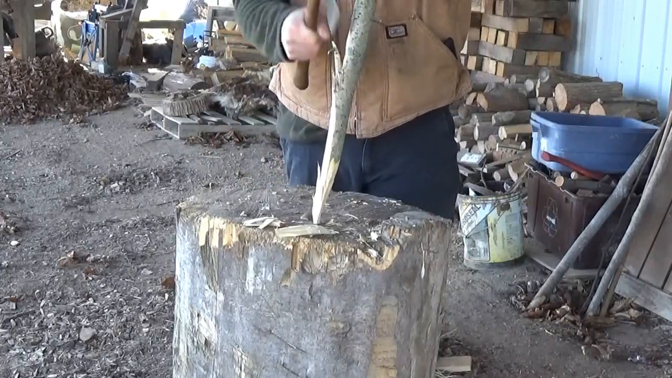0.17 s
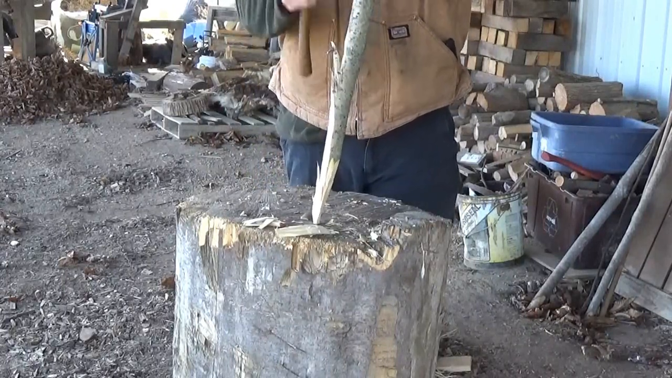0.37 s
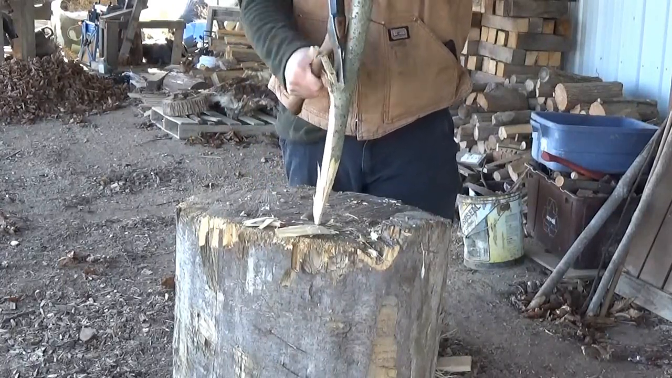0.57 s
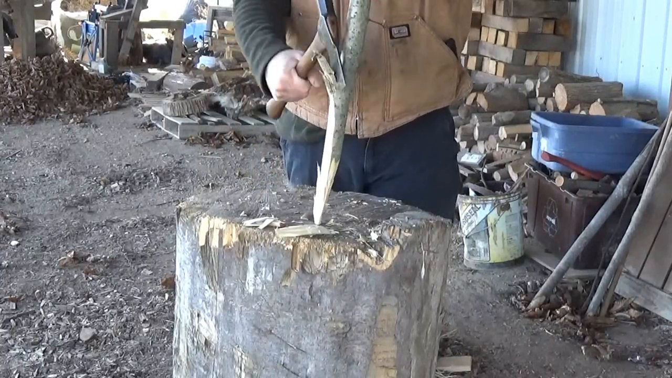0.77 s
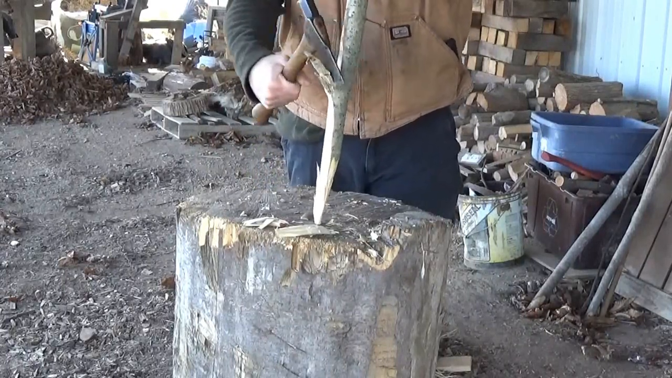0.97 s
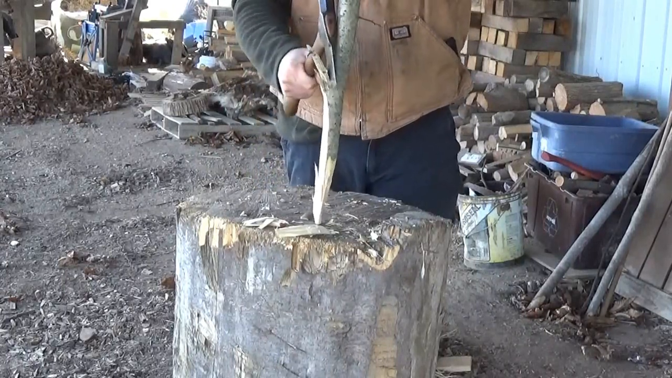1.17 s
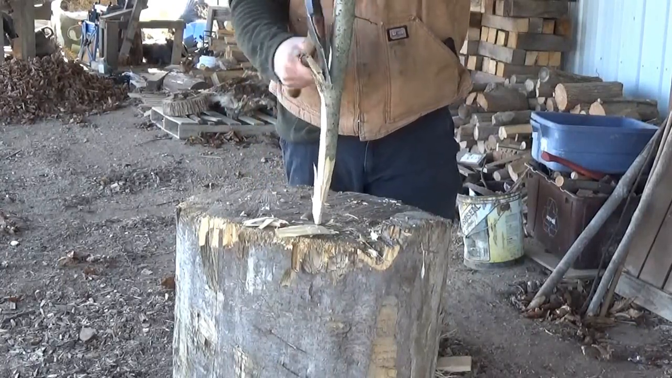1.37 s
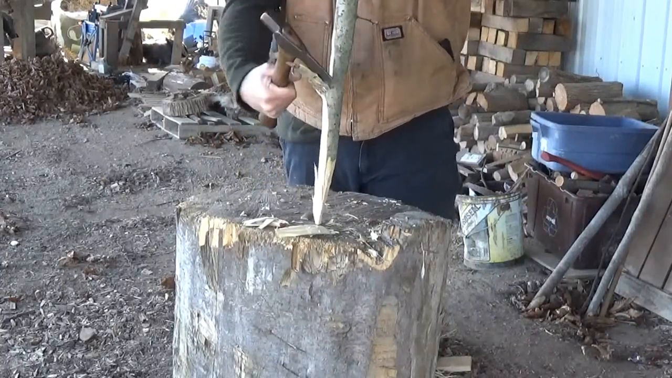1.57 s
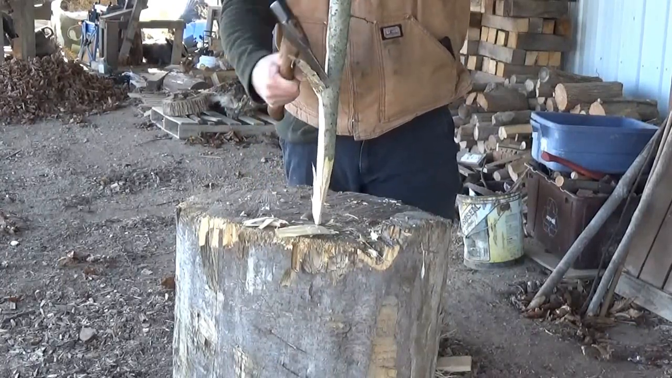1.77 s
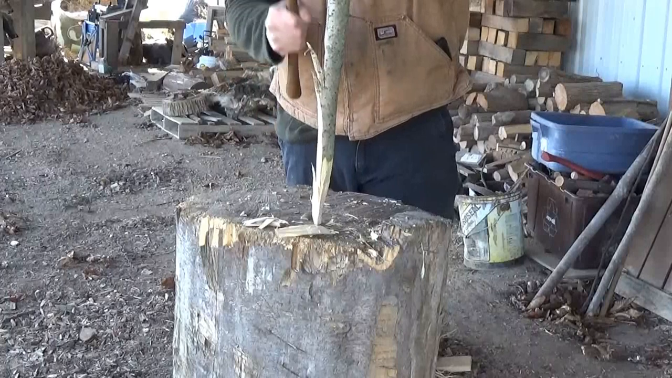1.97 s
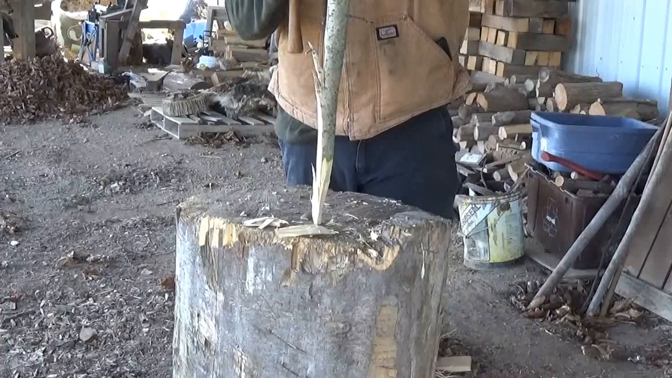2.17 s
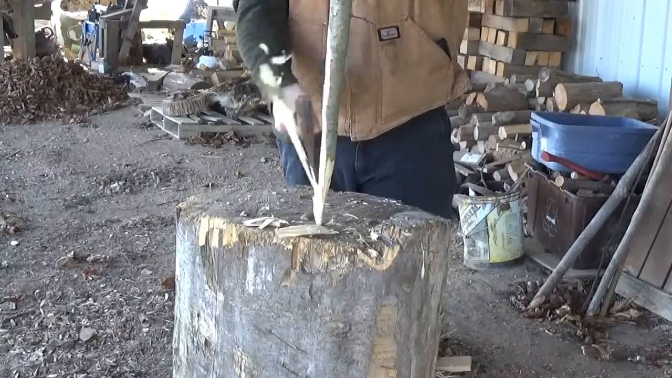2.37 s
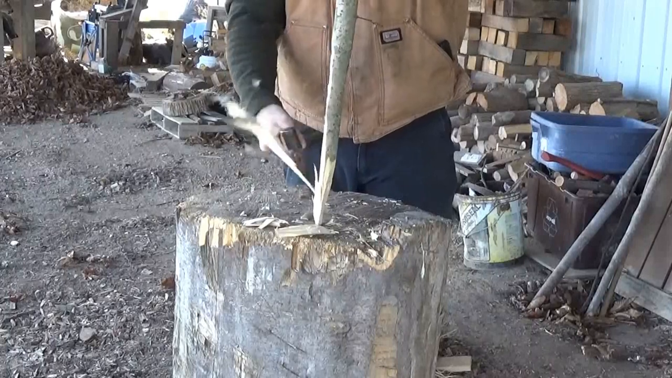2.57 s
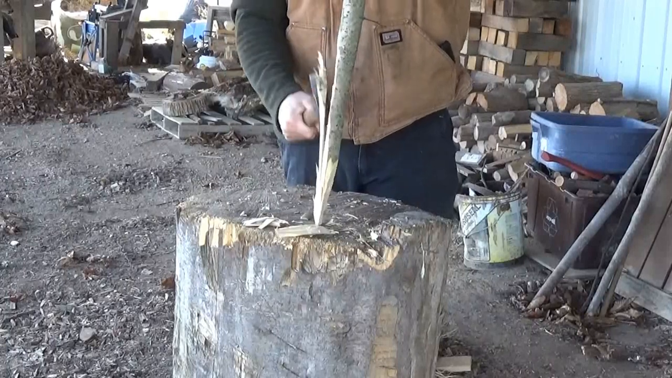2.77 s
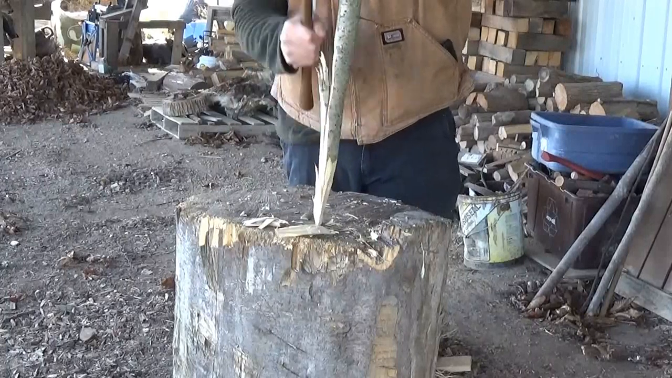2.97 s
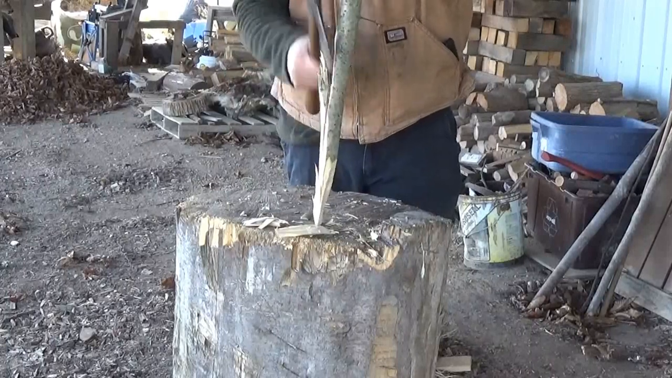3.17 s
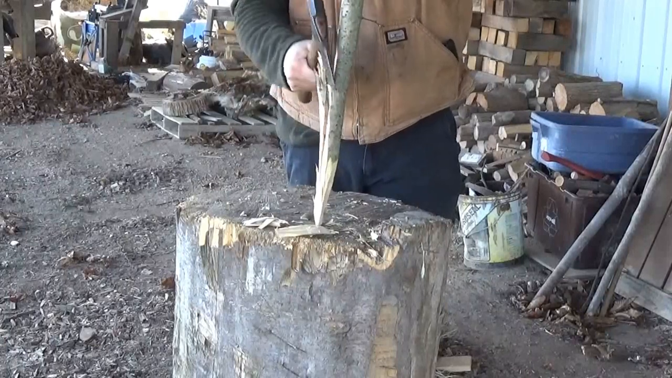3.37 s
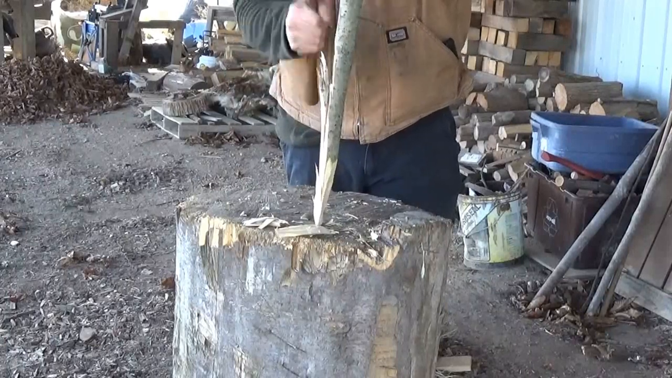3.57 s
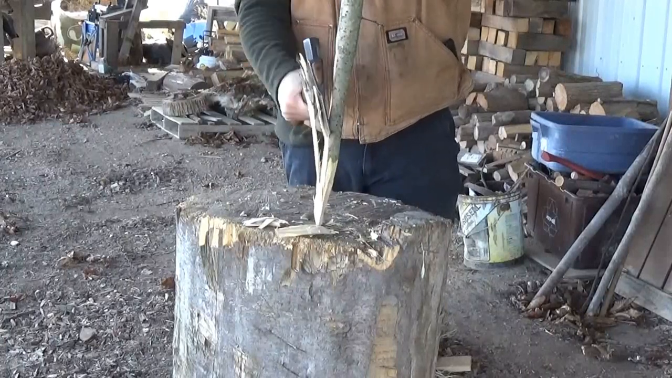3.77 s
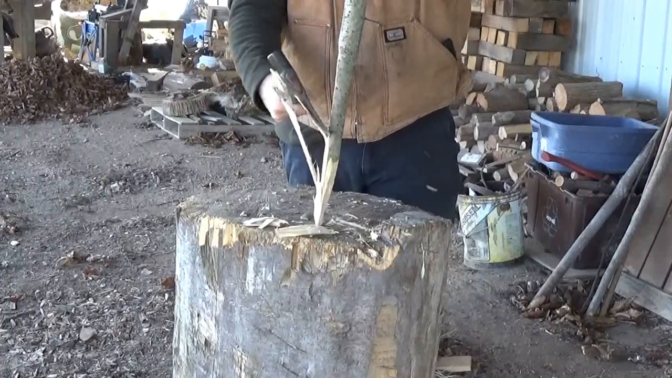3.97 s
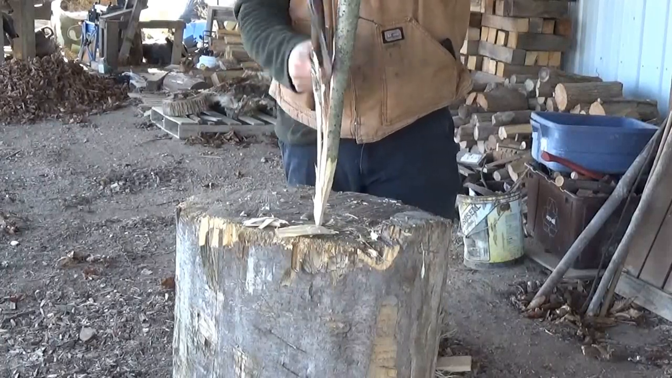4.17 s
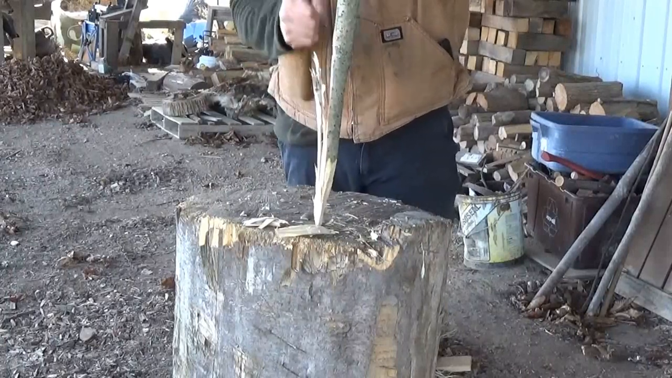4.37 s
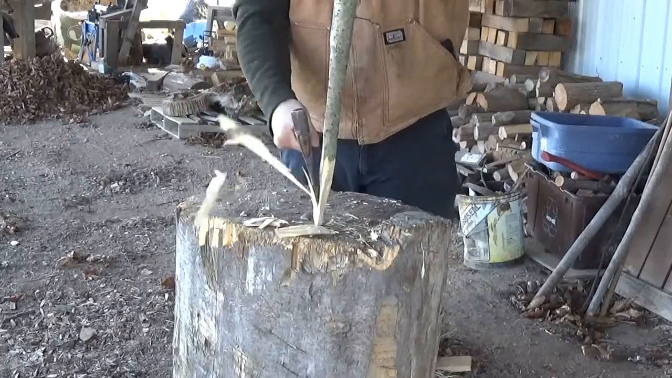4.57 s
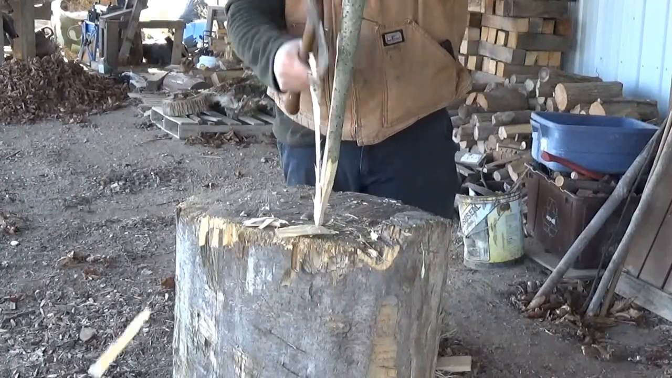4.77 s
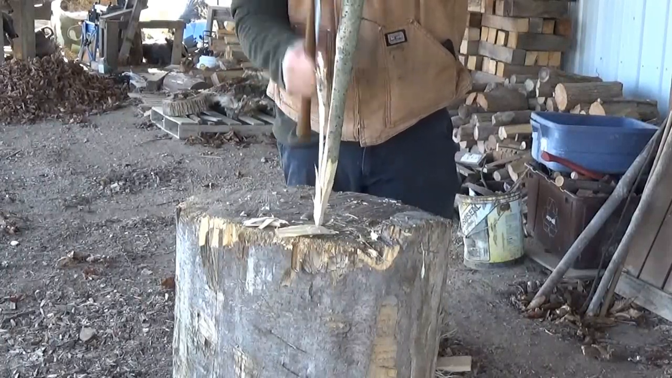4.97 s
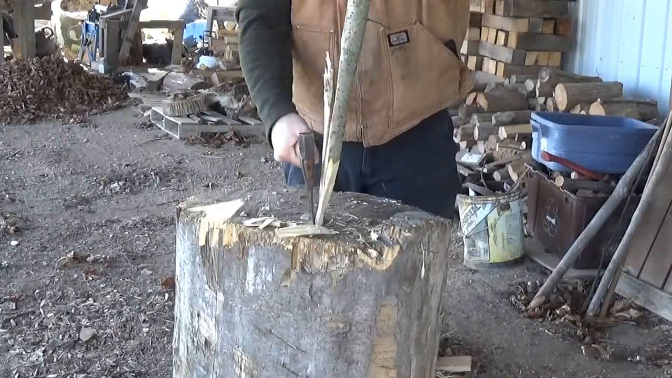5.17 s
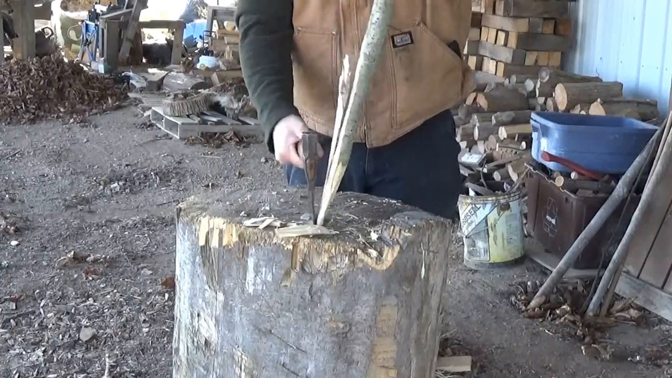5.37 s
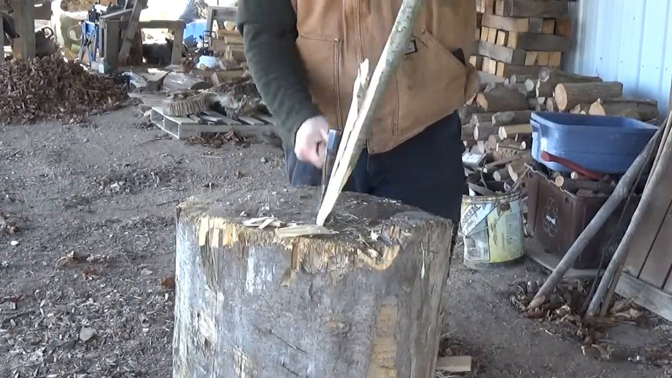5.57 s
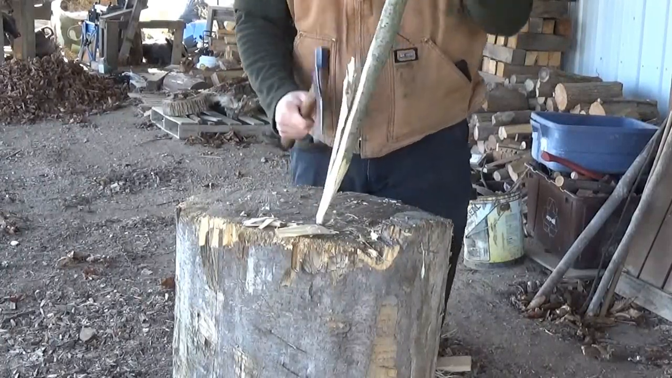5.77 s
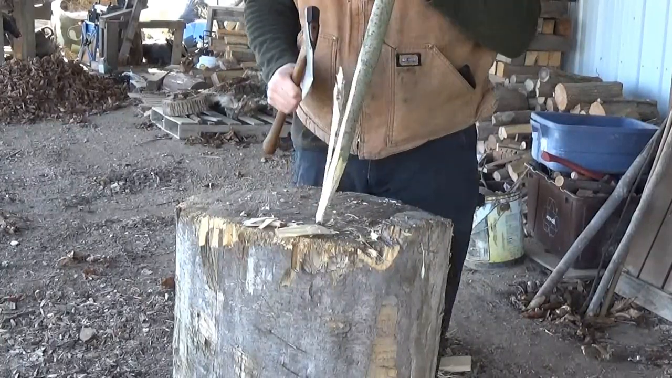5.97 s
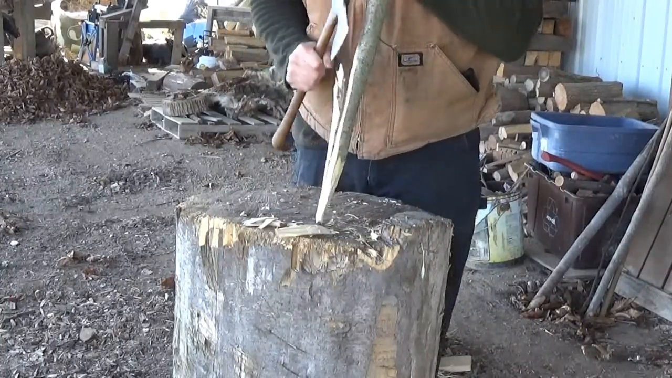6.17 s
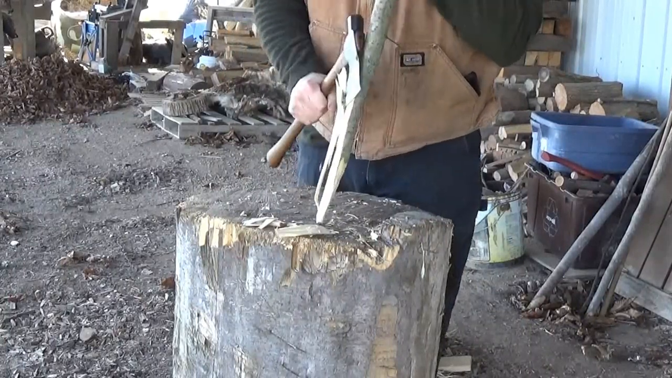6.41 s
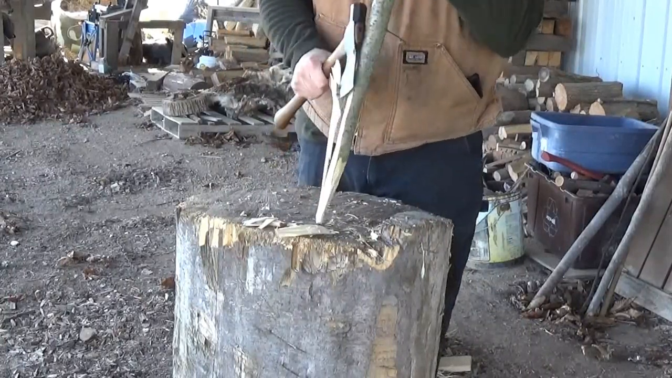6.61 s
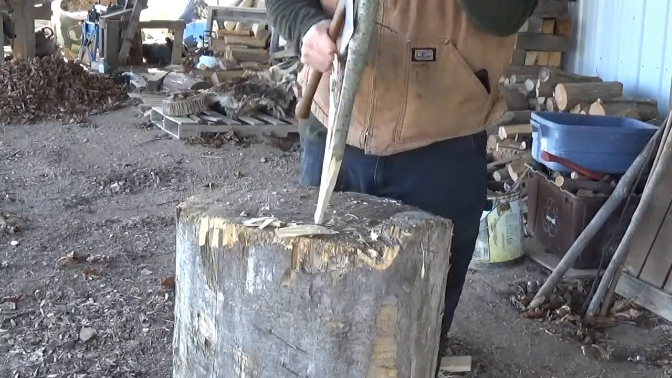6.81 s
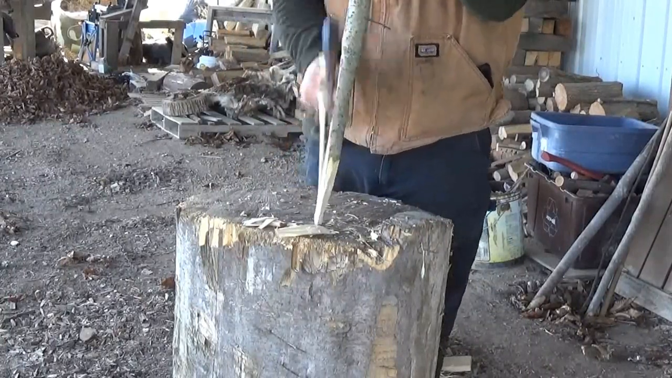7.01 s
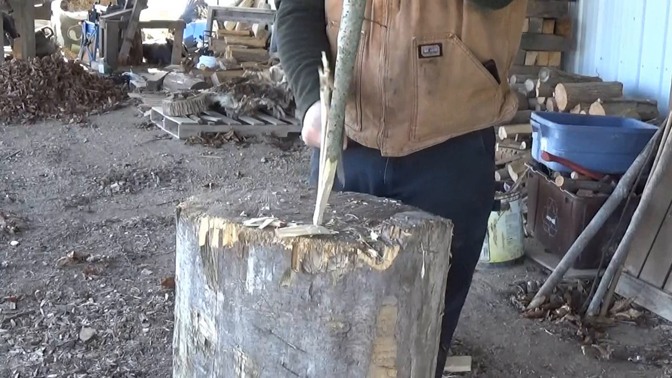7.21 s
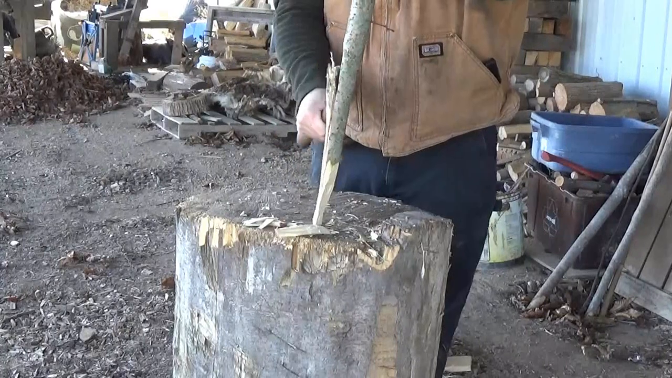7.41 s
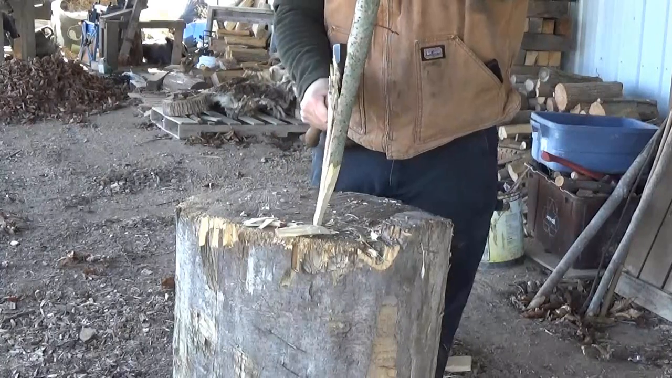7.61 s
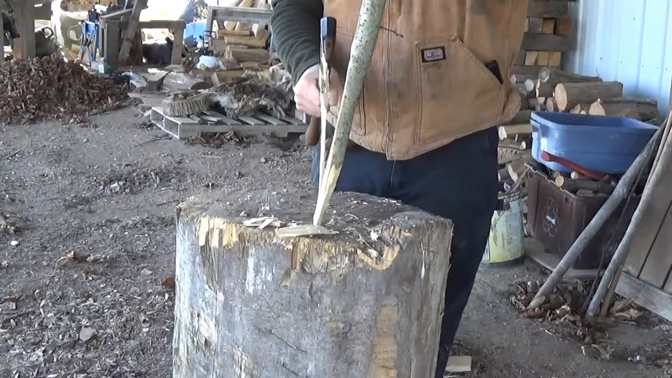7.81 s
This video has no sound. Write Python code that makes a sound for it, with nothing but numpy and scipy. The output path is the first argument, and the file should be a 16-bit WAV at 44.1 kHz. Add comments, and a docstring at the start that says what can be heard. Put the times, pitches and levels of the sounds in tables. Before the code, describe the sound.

Uneven hatchet blows on a wooden pole, crisp cracks and fibre tears between them, with short echoes under an open shed.

```python
"""A hatchet points a green wooden pole on a chopping block under an open shed: noisy pushes excite pole and block.
Spiky noise forms the tears along the grain, short bursts the clicks of splitting wood, wavering sines the grazed steel.
Decaying noise tails give the answers of shed and yard.
Shaped noise gives light wind on the microphones and a background that swells after some blows; faint sines hum."""
import sys
import numpy as np
from scipy import signal
from scipy.fft import rfft, irfft, next_fast_len
from scipy.io import wavfile
from scipy.ndimage import uniform_filter1d, map_coordinates

SR = 44100
rng = np.random.default_rng(int(sys.argv[2]) if len(sys.argv) > 2 else 0)


def dump(signal):
    """Clip the signal to [-1, 1] and save it as 16-bit WAV at the path in sys.argv[1]."""
    limited = np.clip(np.atleast_2d(signal).T, -1, 1)
    pcm = np.round(limited * 32767).astype(np.int16)
    wavfile.write(sys.argv[1], SR, pcm)


N = 346185

# Blows on pole and block. Each row: start in seconds, strength in dB, sharpness (times a band's lean gives dB),
# thud adjustment in dB, seconds for the push to fall 20 dB (before limits), favoured pitch in Hz, favour in dB.
BLOWS = [(.535, -20.5, 1.5, -32, 0.0061, 2150, 6), (.551, -28, -2, -3, 0.0032, 1360, -7),
         (.744, -57.5, 2.5, -17, .02, 1720, 13.5), (1.196, -43, -4.5, 0.5, 0.0066, 2520, 26),
         (1.921, -35, -4, -14, 0.0075, 1280, 8.5), (1.999, -57, 14, -11, 0.006, 1800, 5.5),
         (2.383, -21, 2, -13.5, 0.046, 2620, 0), (2.711, -52, 1, -13, 0.0051, 2450, 10),
         (2.824, -54.5, 2, -11, .0046, 1310, 12), (2.911, -49, 0, -11, .0065, 1390, 9),
         (2.94, -42.5, -1, -21, 0.0035, 1240, 1), (3.025, -51.5, -5, -16, 0.0019, 2200, 1.5),
         (3.274, -24, 0.5, -11, 0.0055, 2760, 6), (3.466, -59.5, -1.5, -9, 0.0078, 1750, 13),
         (3.537, -66, 10.5, -3, 0.0088, 2040, 27), (3.715, -19.5, 1, -22.5, 0.019, 1240, 6),
         (3.914, -56.5, -0.5, -11, 0.0081, 1750, 15.5), (4.529, -29, -2, -10.5, 0.02, 1260, 10.5),
         (5.083, -42, 0, -2, 0.0086, 2580, 19), (5.105, -29, 1, -12, 0.0029, 1790, 0),
         (5.139, -19.5, -0.5, -3, 0.0034, 1447, 22.5), (5.156, -29, -6, -9, .008, 1430, 21),
         (5.335, -53, -2, -4, .02, 1490, 21), (5.56, -27.5, -2.5, -10, 0.0092, 1060, 17),
         (5.567, -36.5, 3.5, -11, 0.0074, 2020, 22), (5.624, -46.5, 0.5, -8, 0.0069, 2020, 17),
         (6.394, -42.5, 0.5, -4, 0.024, 2900, 0), (6.421, -24, 1.5, -19, 0.0062, 1470, 6.5),
         (6.586, -50.5, -1, -19, 0.011, 1085, 21), (6.862, -51, 1.5, -15, 0.019, 1860, 4),
         (6.932, -57.5, 8, -3, 0.008, 1860, 2), (7.072, -33, 1, -24, 0.0029, 690, 7),
         (7.095, -38.5, -0.5, -12, 0.0043, 1806, 10.5), (7.318, -42.5, 2, -5, 0.01, 2400, 2),
         (7.388, -46, -0.5, -2.5, 0.0074, 760, 2), (7.808, -54, -2, -14, 0.0071, 1230, 8)]
# A blow before the start, only its tail is heard. Columns as BLOWS without the start.
LAST_BLOW = (-28, -0.5, -8, -4, 1398, 15)
# Broad bands of pole and block: hollow, knock, bite. Each row: centre in Hz, width in Hz, level in dB, lean.
KNOCK_BANDS = [(776, 467, 23, -1.49), (1320, 665, 25.5, 0.031), (3056, 2920, 28, 1.28)]
# Thud of the block, one row: centre in Hz, width in Hz, level in dB before each blow's adjustment.
BLOCK_THUD = (297, 440, 17.6)
# Modes of the pole. Each row: centre in Hz, width in Hz, level over the broad knock in dB.
POLE_MODES = [(132, 11, 7), (253.5, 71, 1), (397, 33, 2.5), (512, 54, 2), (670, 56, 3.5), (820, 200, -9),
              (967, 136, -1), (1140, 64, -2), (1253, 59, -0.5), (1367, 59, -5.5), (1486, 38, -2.5),
              (1768, 170, 5), (2050, 62, -11), (2314, 119.5, 3), (2720, 62, 2.5)]
# Scattered answer of the shed. Each row: pitch in Hz, T60 in seconds, ratio of shared to separate echo.
SHED_DECAY = [(152, 0.31, 11), (690, 0.27, 4), (2000, 0.25, 2.5), (5000, 0.21, 0.67), (10500, 0.14, 1.6)]
# Wind buffeting over time. Each row: time in seconds, level in dB; calm after the last.
WIND_LEVEL = [(0, -82), (.15, -90), (.27, -78), (.5, -91), (.93, -75.5), (1.3, -87), (1.6, -83),
              (1.85, -82), (2.12, -69.5), (2.3, -89), (2.45, -82), (2.7, -86), (2.85, -84), (3.2, -100)]
# Colour of the buffeting. Each row: pitch in Hz, relative density in dB per Hz.
WIND_SPECTRUM = [(15, -60), (40, 4), (80, 5), (170, -4.5), (280, -11), (450, -15.5), (700, -48),
                 (1300, -120)]
# Single thumps of wind. Each row: centre in seconds, level in dB, half length in seconds, pitch in Hz.
WIND_PUFFS = [(0.664, -67, 0.017, 149), (0.94, -68, 0.038, 129), (1.121, -52.5, 0.017, 195),
              (1.45, -83, 0.0097, 110), (1.733, -70, 0.02, 110), (1.596, -69, .03, 60),
              (1.96, -70, 0.019, 90), (2.1, -68, 0.036, 70), (2.387, -68, 0.0099, 50),
              (2.541, -63.5, 0.019, 151)]
# Level of the background noise, which swells after some blows like a long faint echo.
# Each row: time in seconds, level in dB.
BACKGROUND_LEVEL = [(0.0, -57.5), (0.39, -63.5), (0.79, -60.5), (2.41, -62.5), (2.56, -56.5), (3.08, -63),
                    (3.98, -60.5), (4.44, -64), (5.88, -59.5), (6.04, -62.5), (6.54, -60), (7.85, -62.5)]
# Colour of the background noise. Each row: pitch in Hz, relative density in dB per Hz.
BACKGROUND_SPECTRUM = [(15, -73), (25, -9), (100, -19.5), (256, -15.5), (338, -13.5), (403, -14),
                       (560, -10), (703, -10), (797, -8), (1260, -8.5), (2970, -8), (3280, -7),
                       (10500, -14), (13600, -42), (22000, -120)]
# Left-right likeness of the background noise. Each row: pitch in Hz, correlation (no unit).
BACKGROUND_LIKENESS = [(60, 1), (170, 0.95), (490, 0.67), (1420, 0.28), (4060, 0.54), (11600, 0.78)]
# Faint far tones. Each row: start in seconds, end in seconds, pitch in Hz, peak level in dB.
FAR_HUMS = [(.4, 0.497, 273, -91), (1.397, 1.72, 1136, -73), (2.698, 3.02, 278, -82),
            (5.644, 6.41, 290, -82.5)]
# The blade ripping along the grain. Each row: start in seconds, level in dB, treble over middle in dB,
# rise in seconds, length in seconds (8 dB of fall).
TEARS = [(0.183, -51.5, -1, .0075, .045), (0.288, -54, 0.5, 0.02, 0.031), (.533, -19.5, -13, .0015, 0.067),
         (1.193, -30, -28, .0012, .054), (1.569, -46.5, 3, 0.00085, 0.031),
         (1.709, -47.5, 6, 0.0034, 0.017), (1.914, -41.5, 0, 0.007, 0.02),
         (1.979, -43.5, -2, 0.0052, 0.052), (2.362, -27.5, -25, 0.0032, 0.019),
         (2.38, -17, -2.5, .0071, 0.08), (2.495, -34.5, -5, 0.0063, 0.034), (2.576, -30, -4, 0.0027, 0.042),
         (2.819, -45, 1, .0021, 0.038), (2.911, -46.5, -14, .0044, 0.22),
         (3.009, -30.5, -13, .0026, 0.0056), (3.271, -27, -2, 0.0024, 0.046), (3.506, -49, -3, .025, 0.045),
         (3.713, -22.5, 1, .014, 0.054), (3.963, -45, 1, 0.018, 0.032), (4.114, -48.5, 2.5, 0.076, 0.02),
         (4.528, -19, -5.5, 0.019, 0.061), (4.723, -48, -6, 0.019, 0.092), (5.079, -26, -1, .0055, 0.0062),
         (5.101, -26, -2.5, 0.0053, 0.045), (5.125, -19.5, -1.5, .0053, 0.011),
         (5.56, -29.5, -33, .0026, 0.018), (5.934, -50.5, -2.5, 0.058, .04), (6.201, -64, 11, .008, 0.016),
         (6.259, -51, -28, 0.016, 0.027), (6.38, -27, -2, 0.016, 0.063), (6.565, -38, -5, .026, 0.029),
         (6.86, -49.5, -4, 0.0038, 0.06), (6.928, -48.5, -29, .002, 0.039), (7.07, -42, -4, 0.0022, .05),
         (7.089, -37.5, 1.5, 0.017, 0.08), (7.313, -42.5, 4, .0078, 0.015), (7.388, -38, -2, .0015, 0.016)]
# Modes of the hatchet head. Each row: pitch in Hz, T60 in seconds, level in dB.
STEEL_MODES = [(2200, 0.36, 3.5), (3840, .31, 2), (5255, .33, 2), (5470, 0.35, 8.5), (7840, .45, 2),
               (10600, .3, -4.5)]
# Grazes of the head. Each row: start in seconds, seconds until the wood damps it, level in dB,
# pitch in Hz of the mode rung best.
GRAZES = [(.2, 0.02, -55.5, 5150), (.54, 0.08, -47, 5530), (1.979, .09, -53, 2230),
          (1.995, 0.092, -55, 3750), (2.361, 0.013, -45.5, 2230), (2.503, .02, -54, 5240),
          (2.917, 0.043, -49, 5240), (3.535, 0.055, -57, 3700), (3.688, .014, -59.5, 2210),
          (3.726, 0.039, -32.5, 5600), (3.815, 0.0047, -41, 5170), (4.549, 0.05, -42, 5240),
          (6.335, .015, -60, 2230), (6.815, .023, -61, 5170), (6.91, 0.046, -59, 2260),
          (7.032, .13, -61, 7600), (7.046, .03, -60, 10400), (7.073, .012, -48.5, 5440),
          (7.09, 0.093, -44.5, 5160), (7.605, 0.059, -68, 5200), (7.755, 0.021, -67, 5150),
          (7.809, 0.042, -60, 5150), (7.812, .04, -62, 2250)]
# Sharp clicks of splitting wood, some of them early echoes of a click just before.
# Each row: time in seconds, middle level in dB, treble level in dB, middle pitch in Hz, length in ms.
CLICKS = [(.2094, -29, -26, 5100, 1.1), (.225, -20, -28, 3480, 0.5), (.5478, 10.5, -11, 4940, .54),
          (.5524, 3, 3, 2940, 3.1), (.8547, -20.5, -43, 6400, 1.8), (.9058, -35, -34, 5100, 2.1),
          (1.0075, -23, -16.5, 6000, 0.43), (1.028, -37, -18, 6040, 0.48), (1.0317, -43, -25, 5900, .55),
          (1.0633, -17, -9, 5900, 0.51), (1.067, -38, -13, 6800, 0.31), (1.0859, -28, -36, 3900, .9),
          (1.156, -32, -32, 5300, 3.6), (1.1966, -36, -10.5, 5900, 2), (1.567, -20, -20, 5000, 0.92),
          (1.6204, 9, 1.5, 5330, 0.23), (1.6241, -29, 3.5, 6400, 0.19), (1.637, -9, -25, 5860, 0.37),
          (1.712, -17.5, -15.5, 4460, .55), (1.9793, -17, -33, 3770, 3.1),
          (1.9962, -14.5, -16.5, 4040, 0.81), (2.3675, -11, -21, 3200, .95), (2.3888, 11, 8, 4040, 0.27),
          (2.3923, -14, 0, 3100, 1.1), (2.4024, -9, 6, 6000, 1.1), (2.4126, -5, 12, 5400, 0.36),
          (2.423, 2, -1, 2370, 2.3), (2.4635, -12, -21, 5600, 0.62), (2.5033, -25, -19, 4400, 1.9),
          (2.5806, -24, -4.5, 6140, 2.9), (2.586, -12.5, -21, 4260, 1.1), (2.6984, -43, -24, 4400, 0.67),
          (2.7252, -25, -36, 4430, 2.2), (2.7404, -25, -28, 4300, 1.8), (2.8229, -17.5, -15.5, 4960, 2.1),
          (2.9441, -8, -10.5, 4240, 1.4), (2.9683, -17, -9, 5000, 1.3), (3.0127, -29, -7, 3000, 2.8),
          (3.0152, -5.5, -11, 2120, 1.6), (3.2254, -18.5, -16, 5900, 1.2), (3.2893, 2.5, -14, 2580, 9.1),
          (3.4013, -35, -29, 2900, 1.1), (3.4687, -27.5, -25, 4800, 0.94), (3.7375, 9.5, 1, 5630, 5.5),
          (3.817, -7.5, -14, 5000, 1.9), (3.8486, -33, -6, 5600, 2.7), (3.9632, -19, -8, 4600, 1.1),
          (3.9672, -17, -19, 6200, 0.76), (4.191, -37.5, -26, 5400, 1.1), (4.531, -7, -10, 4530, 1.4),
          (4.5503, -15.5, 3, 5400, 3.3), (4.553, -14, 4, 5030, 1.5), (4.5561, 9.5, -8.5, 5180, 8.5),
          (4.6261, -14, -10, 4800, 6.9), (5.0864, -9, -3.5, 4900, 3.4), (5.0892, -7, 6.5, 6100, 1.5),
          (5.092, -2.5, -5.5, 5300, 6.9), (5.1218, -6, -14, 3600, 3.3), (5.1341, -22, -0.5, 4400, 4.8),
          (5.1425, 12.5, -6, 3270, 2), (5.228, -36, -25, 2400, 2.7), (5.3259, -29, -24, 5000, 1.7),
          (5.6233, -28, -22, 2300, 2.3), (5.6305, -35, -11.5, 2100, 0.83), (5.7109, -40, -17, 6200, 0.49),
          (5.7202, 7, 3, 6000, 0.44), (5.7215, 2, -28, 2570, .6), (5.8253, -45, -26, 5700, 4.3),
          (5.831, -46, -18, 5900, 0.9), (5.8878, -43, -23.5, 4260, 1.3), (5.903, -38, -25, 4000, .57),
          (5.9236, -28, -21, 5700, 1.1), (5.931, -16.5, -12.5, 5200, 0.75),
          (5.9405, -18.5, -35, 4360, 0.76), (6.3434, -26, -39, 2940, 2.4), (6.3932, 2, -5, 5000, 0.72),
          (6.4112, -2, -4.5, 4000, 1.6), (6.4246, 10, -35, 3000, 1.26), (6.458, -25, -15.5, 3000, 2.5),
          (6.574, -25, -20, 5200, 2.1), (6.587, -34, -13.5, 5000, 1), (6.6016, -32, -14, 5200, .4),
          (6.8635, -20, -34, 4700, 1.1), (6.9342, -17, -30, 5300, 3.6), (7.0736, -1, -36, 3730, 2.9),
          (7.3198, -6, -23, 4570, 1.2), (7.3905, -9, -28, 4600, 3.3), (7.8097, -32, -38, 4470, 2.4)]
# Overall tone colour, dull above 11 kHz. Each row: pitch in Hz, gain in dB.
OVERALL_TONE = [(30, -4), (90, 9.5), (200, 10), (3500, -2), (5400, -1), (7100, -2.5), (9800, 1.5),
                (11000, 0.5), (11400, -32), (12100, -33)]

LEAD = SR // 2  # samples of event track before time zero
LAST_BLOW_S = -.03
FAR_DB, FAR_T60_S, FAR_HZ, FAR_WIDTH_HZ = -21, 0.73, 2500, 7600
TEAR_HZ, TEAR_WIDTH_HZ = 4450, 9050
OTHER_MODES_DB, GRAZE_SPAN_LOG = -15, 0.048  # limit far from the best mode; span in natural-log pitch
STRAYS_PER_TEAR = 3
# loudest over the tear, mean fall from it, span in tear lengths
STRAY_DB, STRAY_SPREAD_DB, STRAY_REACH = 12, 12, 1.3
TOP_HZ = 12242


def amp(db):
    """Amplitude of a level in dB."""
    return 10 ** (np.asarray(db) / 20)


def unit(x):
    """Scale to rms 1."""
    return x / np.sqrt(np.mean(x ** 2) + 1e-20)


def along(points, hz):
    """Interpolate (Hz, value) points on a log axis."""
    f, v = np.transpose(points)
    return np.interp(np.log(hz + 1), np.log(f + 1), v)


def curve(rows):
    """One value per sample from (s, value) rows."""
    return np.interp(np.arange(N) / SR, *np.transpose(rows))


def wobble(knots_per_s):
    """A smooth random curve."""
    knots = rng.standard_normal(int(N * knots_per_s / SR) + 4)
    return map_coordinates(knots, [np.arange(N) * knots_per_s / SR])


def filtered(x, response):
    """Apply a complex response of frequency to x."""
    m = next_fast_len(x.shape[-1] + SR // 4)
    spectrum = rfft(x, m) * response(np.fft.rfftfreq(m, 1 / SR))
    return irfft(spectrum, m)[..., :x.shape[-1]]


def peak(f, hz, width_hz):
    """Response of a causal resonance."""
    return 1j * f * width_hz / (hz * hz - f * f + 1j * f * width_hz)


def even(burst, size):
    """Level a burst's chance spectral peaks and holes over size bins; energy 1."""
    z = rfft(burst)
    local_power = abs(uniform_filter1d(abs(z) ** 2, size))
    flat = irfft(z / np.sqrt(local_power + 1e-12), burst.shape[-1]) * (burst != 0)
    return flat / np.linalg.norm(flat, axis=-1, keepdims=True)


def add(track, s, sound):
    """Mix a sound in at s seconds; the track starts half a second early."""
    at = track[round((s + .5) * SR):][:len(sound)]
    at += sound[:len(at)]


def rush(spectrum, alike):
    """Stereo noise of rms 1; the mid-side balance sets the left-right likeness."""
    def mid_side(hz):
        turn = np.arccos(np.clip(along(alike, hz), -1, 1)) / 2
        return amp(along(spectrum, hz)) * [np.cos(turn), np.sin(turn)]
    mid, side = filtered(rng.standard_normal((2, N)), mid_side)
    return unit(np.array([mid + side, mid - side]))


def blows():
    """A short rough push sounds broad bands of pole and block; the pole's modes stand out of them."""
    out, t = np.zeros(N + LEAD), np.arange(SR // 4) / SR
    thud_hz, thud_width_hz, thud_gain_db = BLOCK_THUD
    for s, strength_db, sharp, thud_db, contact_s, ring_hz, ring_db in [(LAST_BLOW_S, *LAST_BLOW)] + list(BLOWS):
        fall = amp(-20 * t / np.clip(contact_s, .001, .04))
        shape = np.clip(t / 0.00034, 0, 1) * fall * (t < .12)
        push = even(shape * rng.standard_normal(len(t)), size=40)
        spread_db = 1.5 * rng.standard_normal(len(POLE_MODES))

        def colour(f):
            # neighbouring bands have opposite sign, so that they add where they overlap
            broad = sum((-1) ** k * amp(db + lean * sharp) * peak(f, hz, width_hz) ** 2
                        for k, (hz, width_hz, db, lean) in enumerate(KNOCK_BANDS))
            thud = amp(thud_gain_db + thud_db) * peak(f, thud_hz, thud_width_hz) ** 2
            modes = 1
            for (hz, width_hz, db), chance_db in zip(POLE_MODES, spread_db):
                # the place struck favours the modes near one pitch
                favour_db = ring_db * np.exp(-(np.log(hz / ring_hz) / 0.12) ** 2)
                modes = modes + amp(db + chance_db + favour_db) * peak(f, hz, width_hz)
            return (broad - thud) * modes

        add(out, s, amp(strength_db) * filtered(push, colour))
    return out


def shed(x):
    """Scattered echoes decay at a speed set by frequency; every quarter second scatters differently."""
    out, step = np.zeros((2, len(x) + SR)), SR // 4
    delay = 180  # samples
    table_hz, t60_s, share = np.transpose(SHED_DECAY)
    for a in range(0, len(x), step):
        hz, t, z = signal.stft(rng.standard_normal((3, SR // 2)), SR, nperseg=128)
        t60_at = along(np.c_[table_hz, t60_s], hz)[:, None]
        share_at = along(np.c_[table_hz, share], hz)[:, None]
        pair = (share_at * z[0] + z[1:]) / np.sqrt(1 + share_at ** 2)
        tail = signal.istft(pair * amp(-60 * t / t60_at), SR, nperseg=128)[1]
        tail = even(tail, size=60)[:, :2 * step - step // 4]
        wet = signal.fftconvolve(x[None, a:a + step], tail, axes=1)
        out[:, a + delay:][:, :wet.shape[1]] += wet[:, :out.shape[1] - a - delay]
    return out[:, :len(x)]


def far(x):
    """Walls and woodpiles across the yard answer faintly and long: a decaying noise tail."""
    t = np.arange(SR) / SR
    noise = amp(-60 * t / FAR_T60_S) * rng.standard_normal((2, SR))
    tail = filtered(noise, lambda f: peak(f, FAR_HZ, FAR_WIDTH_HZ))
    tail = tail / np.linalg.norm(tail[0])
    return amp(FAR_DB) * signal.fftconvolve(x[None], tail, axes=1)[:, :len(x)]


def wind():
    """Lumpy low noise buffets the microphones; single thumps are resonant noise swells."""
    t = np.arange(N) / SR
    lumps = amp(3.1 * wobble(18))
    out = amp(curve(WIND_LEVEL)) * unit(lumps * rush(WIND_SPECTRUM, [(100, 0.63)]))
    for s, db, half_s, hz in WIND_PUFFS:
        noise = [[1, 0.29], [1, -0.27]] @ rng.standard_normal((2, N))  # partly alike left and right
        thump = unit(filtered(noise, lambda f: peak(f, hz, 1.46 * hz) ** 2))
        out = out + amp(db) * np.exp(-((t - s) / half_s) ** 2) * thump
    return out


def background():
    """Shaped noise swells after some blows like a long faint echo; a few faint sine tones join it."""
    level_db = curve(BACKGROUND_LEVEL) + 0.41 * wobble(7)
    out = amp(level_db) * rush(BACKGROUND_SPECTRUM, BACKGROUND_LIKENESS)
    t = np.arange(N) / SR
    for start_s, end_s, hz, db in FAR_HUMS:
        fade = np.clip(np.minimum(t - start_s, end_s - t) / 0.033, 0, 1)
        out = out + amp(db) * fade * np.sin(2 * np.pi * hz * t)
    return out


def crackle(mid, treble, mid_hz, width_hz):
    """Splitting wood speaks in a middle band and a treble band."""
    f = np.fft.rfftfreq(mid.shape[-1], 1 / SR)
    spectrum = rfft(mid) * peak(f, mid_hz, width_hz) ** 3 + rfft(treble) * peak(f, 9300, 5800) ** 3
    return irfft(spectrum, mid.shape[-1])


def tears():
    """Many tiny fibres part in clumps: noise with a spiky, fast-changing level."""
    out = np.zeros(N + LEAD)
    for s, db, treble_db, rise_s, length_s in TEARS:
        t = np.arange(int((rise_s + 1.2 * length_s + 0.0086) * SR)) / SR
        after = np.maximum(t - rise_s, 0) / length_s
        shape = np.clip(t / rise_s, 0, 1) * amp(-8 * after) * np.clip((1.6 - after) / 1.57, 0, 1)
        # 600 knots a second
        clumps = amp(2.8 * np.interp(t * 600, np.arange(len(t)), rng.standard_normal(len(t))))
        levels = amp([[db], [db + treble_db]])
        mid, treble = shape * clumps * levels * rng.standard_normal((2, len(t)))
        add(out, s, crackle(mid, treble, TEAR_HZ, TEAR_WIDTH_HZ))
    return out


def steel():
    """Sliding contact rings the head's modes unevenly until the wood grips the blade."""
    out, t = np.zeros(N + LEAD), np.arange(SR // 4) / SR
    for s, free_s, graze_db, best_hz in GRAZES:
        shape = np.clip(t / 0.0012, 0, 1) * amp(graze_db - 60 * np.maximum(t - free_s, 0) / 0.022)
        for hz, t60_s, db in STEEL_MODES:
            away_db = OTHER_MODES_DB * (1 - np.exp(-(np.log(hz / best_hz) / GRAZE_SPAN_LOG) ** 2))
            # smoothed noise of about unit spread: pitch, level
            pitch_waver, level_waver = 14 * uniform_filter1d(rng.standard_normal((2, len(t))), 200)
            phase = 2 * np.pi * (hz * t + 45 * np.cumsum(pitch_waver) / SR)
            level = amp(db + away_db - 60 * t / t60_s + 3.7 * level_waver)
            add(out, s, level * shape * np.sin(phase))
    return out


def strays():
    """Rows like CLICKS for lesser fibres: chance moments, sizes and pitches in and after each tear."""
    s, db, treble_db, rise_s, length_s = np.repeat(TEARS, STRAYS_PER_TEAR, axis=0).T
    when, mid, treble, pitch, ms = rng.random((len(s), 5)).T
    time_s = s + when * (rise_s + STRAY_REACH * length_s)
    mid_db = db + STRAY_DB + STRAY_SPREAD_DB * np.log(mid + 1e-3)
    high_db = db + STRAY_DB + STRAY_SPREAD_DB * np.log(treble + 1e-3) + treble_db
    return np.c_[time_s, mid_db, high_db, TEAR_HZ * (.7 + .6 * pitch), .5 + 2 * ms]


def clicks():
    """Sharp clicks of splitting wood, some early echoes: short even bursts, the longer the narrower."""
    out, t = np.zeros(N + LEAD), (np.arange(512) - 160) / SR
    rows = np.r_[CLICKS, strays()]
    noises = rng.standard_normal((len(rows), 2, len(t)))
    for (s, mid_db, treble_db, mid_hz, ms), noise in zip(rows, noises):
        shape = np.exp(-(t / (ms / 2500)) ** 2) * (abs(t) < .003)
        fray = even(noise * shape, size=18)
        # a longer click carries more energy
        mid, treble = fray * np.sqrt(ms + 0.55) * amp([[mid_db], [treble_db]])
        width_hz = 1.1 * mid_hz / (1 + 0.36 * ms)
        add(out, s + t[0] - .0002, crackle(mid, treble, mid_hz, width_hz))
    return out


def scene():
    """The work at the block, the shed and the yard answering, wind and background noise."""
    knock = blows()
    split = tears() + clicks() + steel()
    direct = (knock + split) * amp([[-.3], [.3]])  # dB, left and right
    work = direct + shed(knock + amp(-10) * split) + far(knock + amp(-8) * split)
    return work[:, LEAD:] + wind() + background()


def record(dry):
    """Overall tone colour with a dark top: dull above 11 kHz, silent above 12.2 kHz."""
    return filtered(dry, lambda hz: amp(along(OVERALL_TONE, hz)) * (hz < TOP_HZ))


dry = scene()
out = record(dry)
dump(out)
```